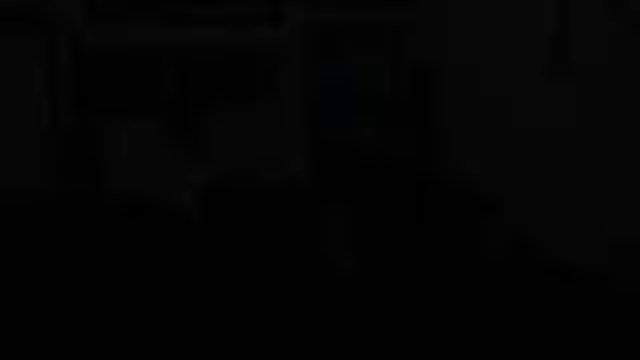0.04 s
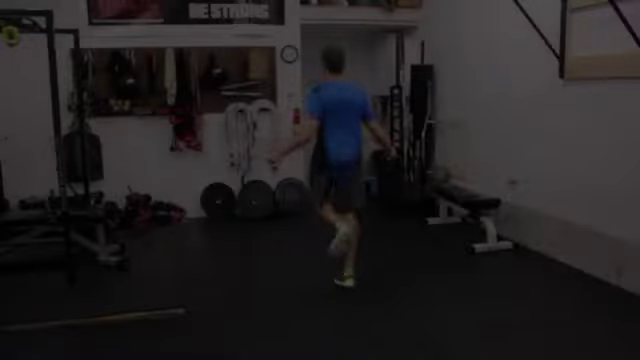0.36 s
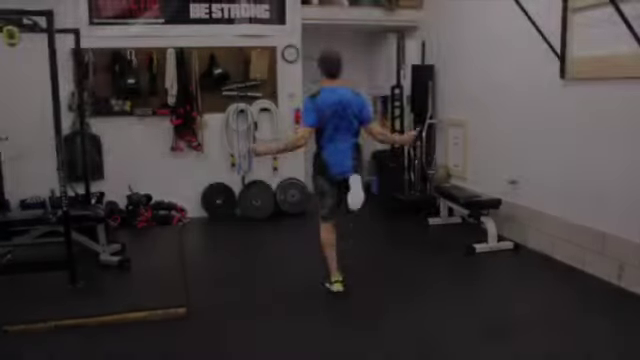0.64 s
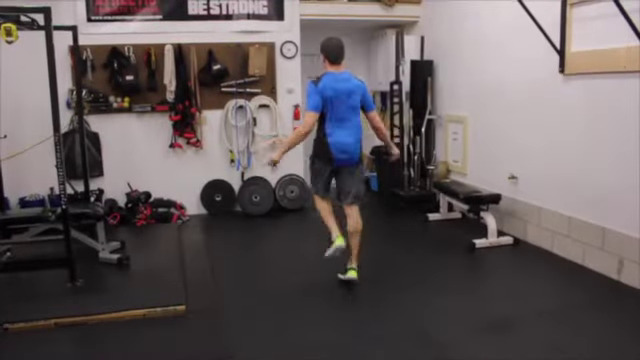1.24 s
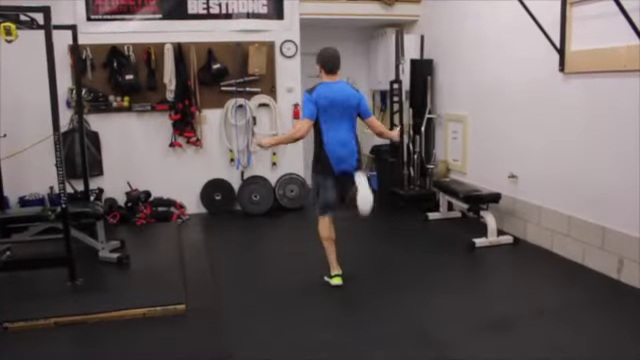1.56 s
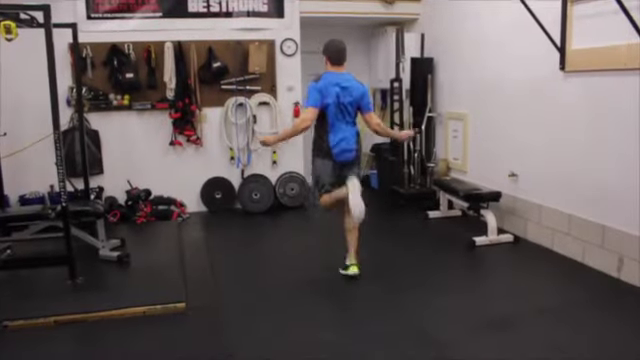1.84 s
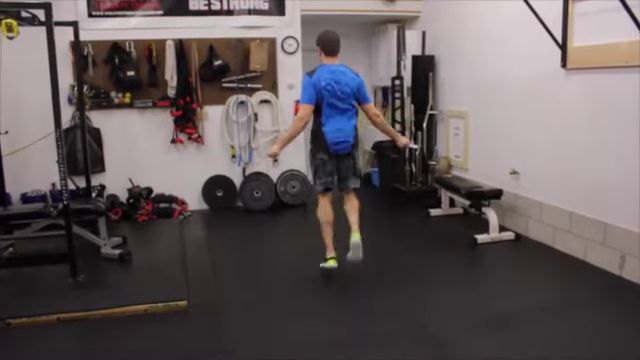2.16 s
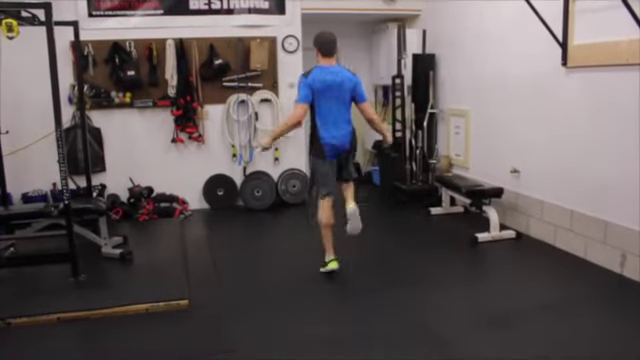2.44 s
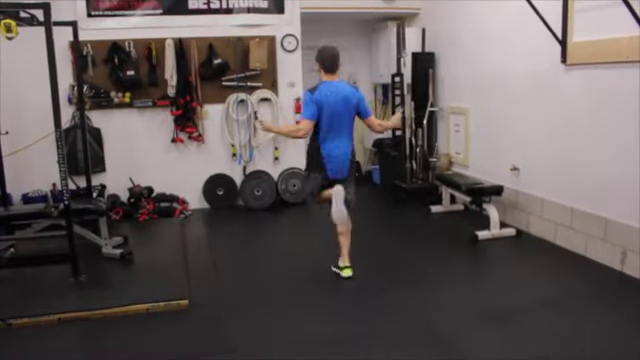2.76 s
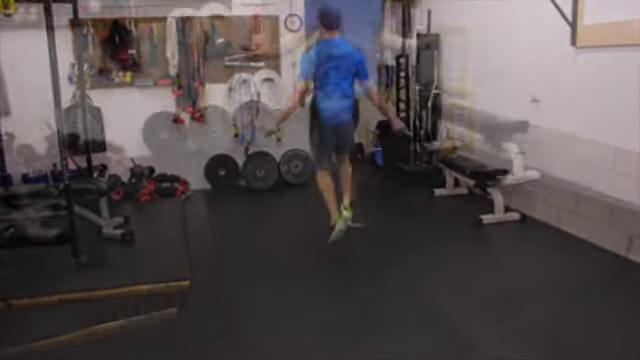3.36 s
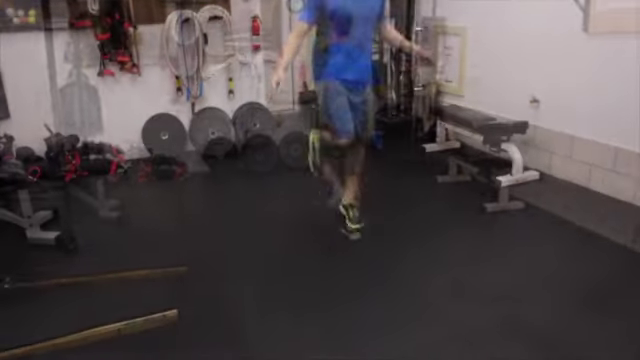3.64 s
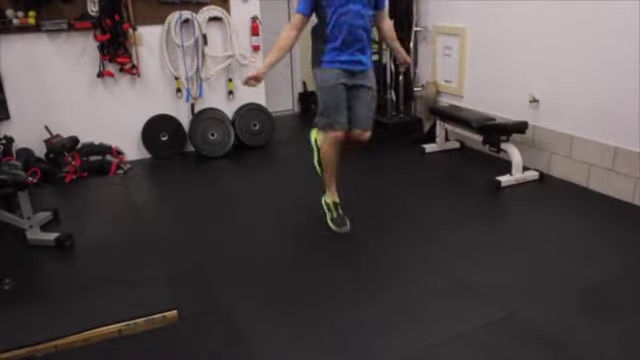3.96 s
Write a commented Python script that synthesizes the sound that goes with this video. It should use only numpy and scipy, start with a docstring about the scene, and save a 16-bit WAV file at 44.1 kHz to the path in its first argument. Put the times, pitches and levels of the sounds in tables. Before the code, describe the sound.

Someone skips rope steadily in an echoing gym, with whooshes, sharp slaps and thudding feet.

```python
"""The sound fades in on someone skipping rope in a small, bare-walled gym, about 2.4 turns a second.
On each turn the rope swishes in its handles and whistles through the air, highest as it sweeps
under the feet. It cracks on the rubber floor, and a shoe lands just after. The handles tick now
and then. Near the end one squeaks faintly, then the rope hops along the floor.
All the while the walls ring over a low hum."""
import sys
import numpy as np
from scipy import signal
from scipy.io import wavfile

SR = 44100
rng = np.random.default_rng(int(sys.argv[2]) if len(sys.argv) > 2 else 0)


def log_audio(samples):
    """Write samples as a 16-bit WAV file to the path given in sys.argv[1]."""
    # one column per channel
    frames = np.atleast_2d(samples).T
    # limit to full scale, then quantise
    limited = np.clip(frames, -1, 1)
    pcm = np.round(limited * 32767).astype(np.int16)
    wavfile.write(sys.argv[1], SR, pcm)


N = 176400
T = np.arange(N) / SR

# The turns of the rope. Each row: floor hit in seconds, crack level in dB, its room ring in dB,
# whistle level in dB and base pitch in Hz for the downswing, then the same two for the upswing.
TURNS = [(0.1060, -1, -2.5, -5, 929.6, -4, 739.6), (0.5290, -3, 1.5, -2, 967.7, -2, 809.9),
         (0.9478, -4.5, 1, -1.5, 960.7, 3, 804.5), (1.3666, -2.5, 0.5, -1.5, 920.5, -2, 729.5),
         (1.7876, -3.5, -0.5, -1, 927.6, -2.5, 748.4), (2.1981, -1.5, -0.5, 0, 1011, 2, 848.6),
         (2.6045, -4.5, -1, 0.5, 972.6, -2.5, 812.6), (3.0284, -4, 1, -2, 966, -1.5, 808.6),
         (3.4354, -5.5, -0.5, -2.5, 950, -7, 778.7), (3.8810, -6.5, -2.5, -5, 829.8, -6, 800)]
# The whistle through one turn. Each row: share of the turn since the hit, pitch factor, level in dB.
SWING = [(0, 1.03, -2), (.1, 1.01, -7), (0.249, .98, -0.5), (.39, .98, -4.5), (0.519, .88, -5),
         (.66, .8, -9.5), (.76, .74, -10), (.84, .88, -6), (.92, 1.02, 3)]
# Pieces of rope from the tip inwards. Each row: share of the tip's speed, band width in Hz, level in dB.
ROPE_PIECES = [(1, 75, -0.5), (.92, 170, -6), (.8, 190, -8.5), (.67, 190, -13)]
# The tone of the rushing air. Each row: frequency in Hz, level in dB.
AIR_TONE = [(100, -33), (300, -12.5), (600, 5.5), (1300, 3), (2200, -1), (3700, -3), (5500, -8),
            (7500, -17), (11000, -20.5), (16000, -30)]
def whistle():
    """Each piece of rope sheds little swirls of air: the faster it moves, the higher it whistles."""
    turn_s, upswing_after_s = .417, .15
    whistle_db, air_db, air_follow, flutter_depth = -32, -41.5, .53, .035
    hits, _, _, down_db, down_hz, up_db, up_hz = np.transpose(TURNS)
    turn_starts = np.r_[hits[0] - turn_s, hits, hits[-1] + turn_s]
    turn = np.interp(T, turn_starts, np.arange(len(turn_starts)))
    swings = np.c_[hits, hits + upswing_after_s].ravel()
    base_hz = np.interp(T, swings, np.c_[down_hz, up_hz].ravel())
    base_db = np.interp(T, swings, np.c_[down_db, up_db].ravel())
    share, pitch_factor, swing_db = np.transpose(SWING)
    tip_hz = base_hz * np.interp(turn, share, pitch_factor, period=1)
    db = base_db + np.interp(turn, share, swing_db, period=1)
    tone = np.zeros(N)
    for speed, width_hz, piece_db in ROPE_PIECES:
        flutter = 1 + flutter_depth * wobble(rate_hz=18)  # the rope wobbles
        tone += amp(piece_db) * fuzzy_tone(tip_hz * speed * flutter, width_hz)
    air = noise(AIR_TONE) * amp(air_db + air_follow * db)
    return in_room(unit(tone) * amp(whistle_db + db) + air, dry_db=-1.5)


# The crack's tone, heard directly and by way of the walls. Each row: frequency in Hz, level in dB.
CRACK_TONE = [(100, -40), (400, -23), (1000, -13), (2000, -7), (3600, 0), (5200, -1.5), (7000, -8.5),
              (10500, -10.5), (15500, -15)]
CRACK_RING_TONE = [(100, -28), (400, -24), (1000, -6), (2000, -3.5), (3600, -0.5), (5200, -4), (7000, -9),
                   (10500, -9.5), (15500, -16.5)]
def cracks():
    """The rope strikes the floor once a turn, and more of it lays down after the first touch."""
    crack_db, room_db = 11, 3.5
    direct, ring = np.zeros((2, N))
    for start, db, ring_db, *_ in TURNS:
        add(direct, start, amp([db]))
        laying_down = amp(-8.5) * burst(decay_s=.015)
        scatter = amp(-6.5) * burst(decay_s=.0052, start_s=.0105)  # echoes off the equipment
        add(ring, start, amp(db) * (reflections(room_db + ring_db) + laying_down + scatter))
    return amp(crack_db) * (tint(direct, CRACK_TONE) + tint(ring, CRACK_RING_TONE))


# The rope's little hops. Each row: start in seconds, level in dB.
HOPS = [(3.898, -7), (3.917, -6.5), (3.922, -17), (3.926, -11), (3.95, -24)]
# Their tone. Each row: frequency in Hz, level in dB.
HOP_TONE = [(200, -21), (1200, 7.5), (2500, 0.5), (4500, 6), (7000, 0), (12000, 2.5), (16000, -6)]
def rope_hops():
    """The rope hops along the floor, clicking at each touch."""
    return clicks(HOPS, HOP_TONE, room_db=7.5)


# The shoe landings. Each row: start in seconds, level in dB.
STEPS = [(.209, -6), (.623, -1), (1.043, -0.5), (1.457, 0), (1.875, -2), (2.270, -2), (2.704, 1),
         (3.122, -2.5), (3.531, -5), (3.884, -8)]
# The tones of the dull thud and the brighter scuff. Each row: frequency in Hz, level in dB.
THUD_TONE = [(30, -38), (70, -22.5), (130, -10), (240, -2), (400, -4), (700, -1), (1300, -15),
             (3000, -29.5), (7000, -48), (16000, -69)]
SCUFF_TONE = [(300, -19.5), (1200, 4.5), (3000, -2), (7000, -8), (16000, -34)]
def steps():
    """The ball of the foot thuds down, then the sole flattens and scuffs a little."""
    thud_db, scuff_db = 12.5, 1.5
    thud, scuff = np.zeros((2, N))
    for start, db in STEPS:
        blow = impact(room_db=5)
        sole = amp(-6) * burst(decay_s=.0091)
        add(thud, start, amp(db) * (blow + sole))
        add(scuff, start, amp(db) * burst(decay_s=.026, rise_s=.0075))
    scuff = in_room(tint(scuff, SCUFF_TONE), dry_db=1)
    return amp(thud_db) * tint(thud, THUD_TONE) + amp(scuff_db) * scuff


# The swishes in the handles. Each row: start in seconds, length in seconds, level in dB.
SWISHES = [(0.458, 0.07, -7), (0.872, 0.067, -4.5), (1.31, 0.052, -7), (1.711, 0.057, 0),
           (2.13, 0.067, -6.5), (2.522, 0.063, -5.5), (2.967, 0.032, -9), (3.356, .06, -5.5),
           (3.732, 0.16, -8)]
# Their tone. Each row: frequency in Hz, level in dB.
SWISH_TONE = [(500, -28), (2000, 0), (3550, 4.5), (4500, -0.5), (6500, -6), (8500, -4), (12000, -7.5),
              (16000, -14)]
def handle_swishes():
    """The rope rubs in the handles as the wrists pull it down, once with a squeak."""
    def gate(start_s, length_s, ramp_s=.008):
        return np.clip(np.minimum(T - start_s, start_s + length_s - T) / ramp_s, 0, 1)
    rubbing = sum(amp(db) * gate(start, length) for start, length, db in SWISHES)
    hiss = amp(-44.5) * rubbing * noise(SWISH_TONE)
    squeak = amp(-51.5) * gate(start_s=3.73, length_s=.134) * fuzzy_tone(hz=3580, width_hz=300)
    return in_room(hiss + squeak, dry_db=4)


# The ticks of the handles. Each row: start in seconds, level in dB.
TICKS = [(1.631, -29), (3.371, -21), (3.401, -19)]
# Their tone. Each row: frequency in Hz, level in dB.
TICK_TONE = [(1000, -36), (7000, -18), (13000, 0), (16000, 2)]
def handle_ticks():
    """Small hard contacts in the handles make thin ticks."""
    return clicks(TICKS, TICK_TONE, room_db=-12)


# Echoes off the nearby walls. Each row: delay in seconds, level in dB.
WALL_ECHOES = [(.0068, -14), (.0075, -6.5), (0.0134, -11.5), (.016, -13.5), (.0212, -11)]
def reflections(room_db):
    """What the room sends back after a blow: single wall echoes and a smooth ring."""
    response = amp(room_db) * room_ring()
    for delay, db in WALL_ECHOES:
        add(response, delay * rng.uniform(.995, 1.005), amp([db]))
    return response


# How long the gym rings. Each row: frequency in Hz, seconds to die away by 60 dB.
RING_TIMES = [(60, 0.23), (200, 0.78), (800, 1), (2000, 1), (4000, 1), (7000, 0.76), (11000, 0.65),
              (16000, 0.62)]
def room_ring(size=32768, delay_s=.005, build_s=.012):
    """Countless echoes blur into dying noise, of energy 1, different for each place on the floor."""
    hz = np.fft.rfftfreq(256, 1 / SR)
    t = np.arange(size // 128 + 1) * 128 / SR
    real, imag = rng.standard_normal((2, len(hz), len(t)))
    decay = amp(-60 * t / read(RING_TIMES, hz)[:, None])
    ring = signal.istft((real + 1j * imag) * decay, SR)[1]
    build_up = np.clip((T[:SR] - delay_s) / build_s, 0, 1)
    ring = np.pad(ring, (0, SR - len(ring))) * build_up
    return ring / np.linalg.norm(ring)


def in_room(x, dry_db, count=3, drift_s=1.2916):
    """The direct (dry) sound plus a blend of rings that shifts as the skipper moves."""
    angle = 2 * np.pi * (T / drift_s - np.arange(count)[:, None] / count)
    shares = np.maximum(np.cos(angle), 0)
    shares /= np.linalg.norm(shares, axis=0)
    return amp(dry_db) * x + sum(signal.fftconvolve(x * share, room_ring())[:N] for share in shares)


# The notes of the hum. Each row: pitch in Hz, band width in Hz, level in dB.
HUM_NOTES = [(78.4, 5.2, -63), (145, 8, -72)]
# How the hum wavers. Each row: time in seconds, level change in dB.
HUM_SWELL = [(.5, 0), (1.3, -4.5), (1.8, 1.5), (2.3, -1), (3.2, -3), (3.65, 5.5), (4, -4)]
# The tone of the room's steady noise. Each row: frequency in Hz, level in dB.
WASH_TONE = [(25, -29), (60, -13.5), (110, -11), (250, -2), (700, -0.5), (1500, -8), (4000, -10),
             (8000, -21), (16000, -44)]
def background():
    """A low, wavering hum over a soft wash of noise."""
    hum = sum(amp(db) * fuzzy_tone(hz, width) for hz, width, db in HUM_NOTES)
    swell = amp(np.interp(T, *np.transpose(HUM_SWELL)))
    return hum * swell + amp(-46) * noise(WASH_TONE)


def impact(room_db):
    """One sharp blow and its echoes."""
    return signal.unit_impulse(SR) + reflections(room_db)


def clicks(rows, tone, room_db):
    """A series of small blows that share one tone."""
    track = np.zeros(N)
    for start, db in rows:
        add(track, start, amp(db) * impact(room_db))
    return tint(track, tone)


def burst(decay_s, start_s=0, rise_s=1e-5, size=8192):
    """A dying puff of noise, of energy 1."""
    t = T[:size] - start_s
    puff = rng.standard_normal(size) * np.clip(t / rise_s, 0, 1) * np.exp(-abs(t) / decay_s)
    return np.pad(puff / np.linalg.norm(puff), (0, SR - size))


def fuzzy_tone(hz, width_hz):
    """A narrow band of noise that follows a pitch; a wider band sounds breathier."""
    pole = np.exp(-np.pi * width_hz / SR)
    white = rng.standard_normal(N) + 1j * rng.standard_normal(N)
    slow_noise = signal.lfilter([1], [1, -2 * pole, pole * pole], white)
    phase = 2 * np.pi * np.cumsum(hz * np.ones(N)) / SR
    return unit((slow_noise * np.exp(1j * phase)).real)


def wobble(rate_hz):
    """Slow random motion, about 1 in size."""
    return np.interp(T * 2 * rate_hz, np.arange(1024), rng.standard_normal(1024))


def noise(tone):
    """Steady noise with the given tone, at level 1."""
    return unit(tint(rng.standard_normal(N), tone))


def tint(x, tone, size=4096):
    """Filters a sound by a tone table, with no ringing ahead of a blow."""
    hz = abs(np.fft.fftfreq(size, 1 / SR))
    log_gain = np.log(amp(read(tone, hz)))
    taps = np.fft.ifft(np.exp(signal.hilbert(log_gain).conj())).real
    return signal.oaconvolve(x, taps[:size // 2])[:len(x)]


def read(table, hz):
    """Reads between a table's rows on a log-frequency scale."""
    row_hz, value = np.transpose(table)
    return np.interp(np.log(hz + 1), np.log(row_hz + 1), value)


def add(mix, start_s, sound):
    """Mixes a sound in at the given time."""
    part = mix[max(round(start_s * SR), 0):][:len(sound)]
    part += sound[:len(part)]


def amp(db):
    """Turns decibels into a gain."""
    return 10 ** (np.asarray(db) / 20)


def unit(x):
    """Scales a sound to an average (rms) level of 1."""
    return x / np.sqrt(np.mean(x ** 2) + 1e-20)


def scene():
    """Rope, feet, handles and room together in one channel."""
    small_clicks = rope_hops() + handle_ticks()
    return (whistle() + cracks() + steps() + handle_swishes() + small_clicks + background())[None]


# The fade-in; its last level holds to the end. Each row: time in seconds, level in dB.
FADE_IN = [(.08, -80), (.11, -46), (.15, -33), (.21, -18), (.35, -8), (.55, -1.5), (.9, 4.5)]
def record(dry):
    """Fades the sound in and cuts the very highest treble."""
    cutoff_hz = 16000
    faded = dry * amp(np.interp(T, *np.transpose(FADE_IN)))
    low_pass = signal.firwin(401, cutoff_hz, window=("kaiser", 9), fs=SR)
    return signal.oaconvolve(faded, low_pass[None], "same")


dry = scene()
out = record(dry)
log_audio(out)
```